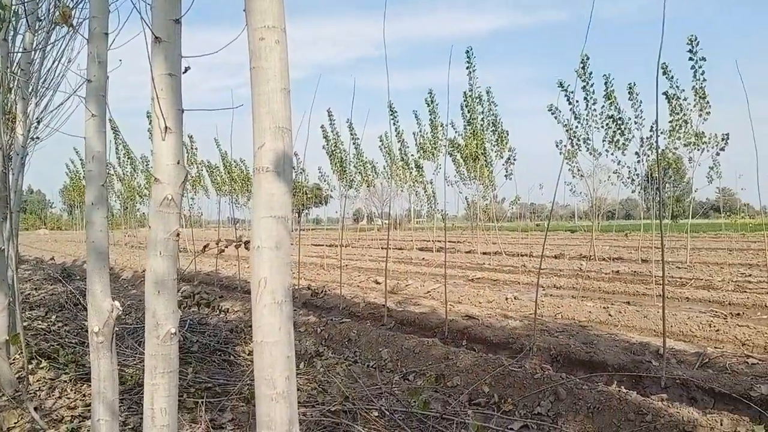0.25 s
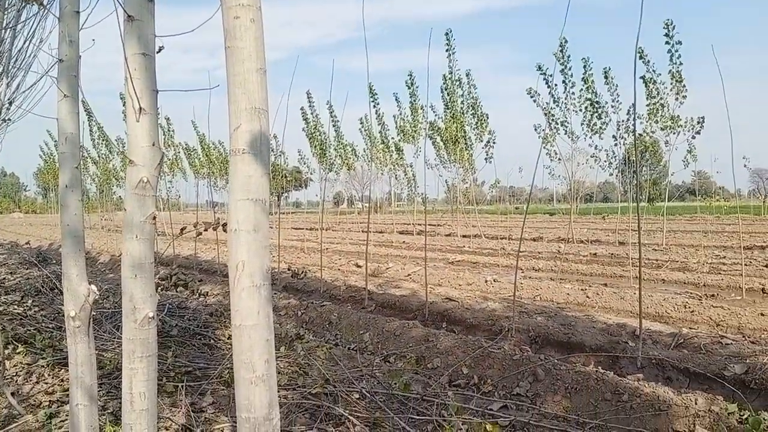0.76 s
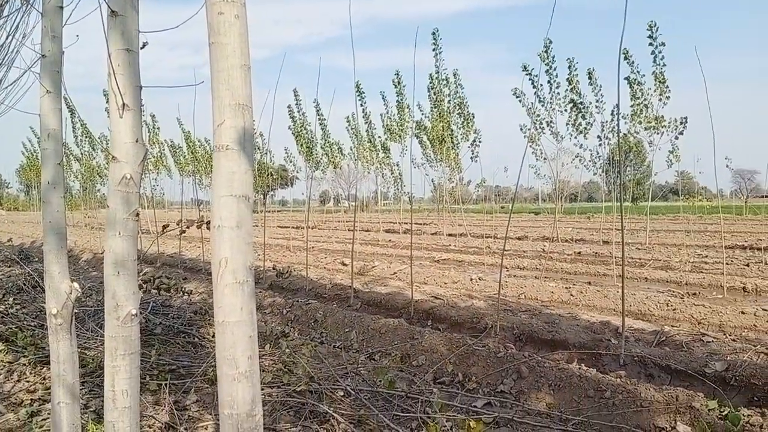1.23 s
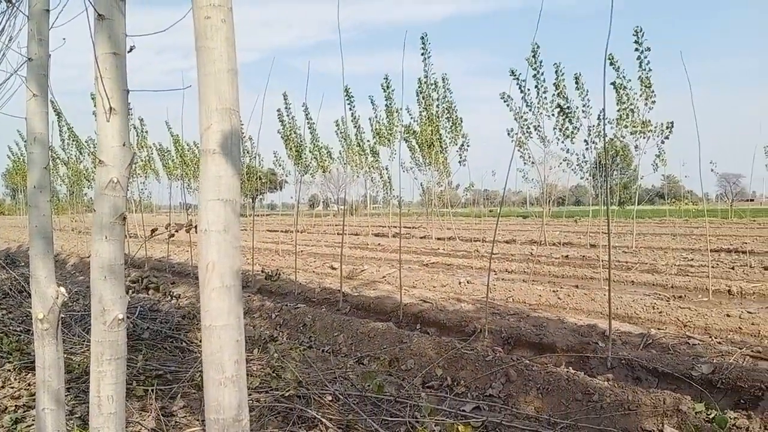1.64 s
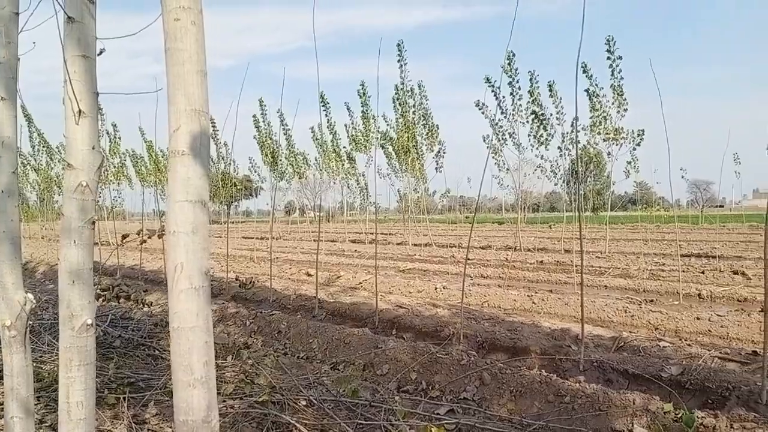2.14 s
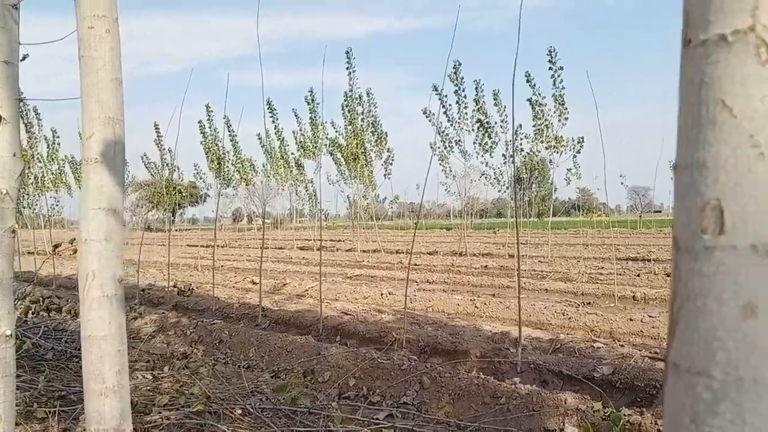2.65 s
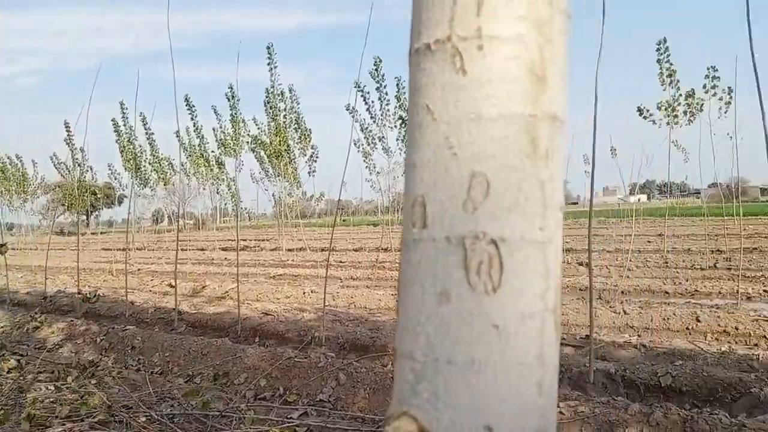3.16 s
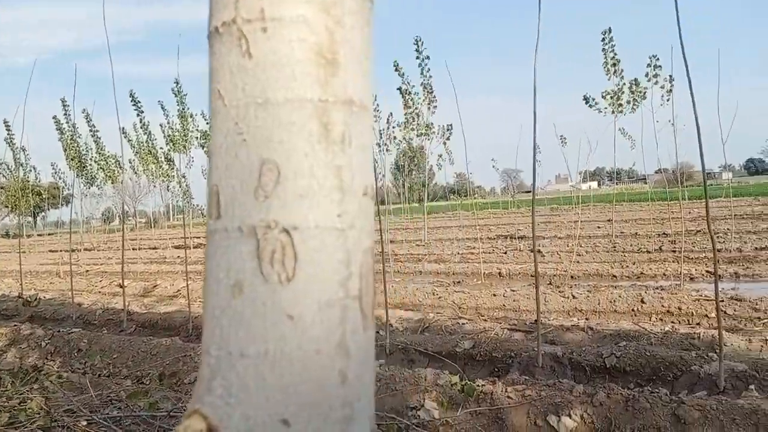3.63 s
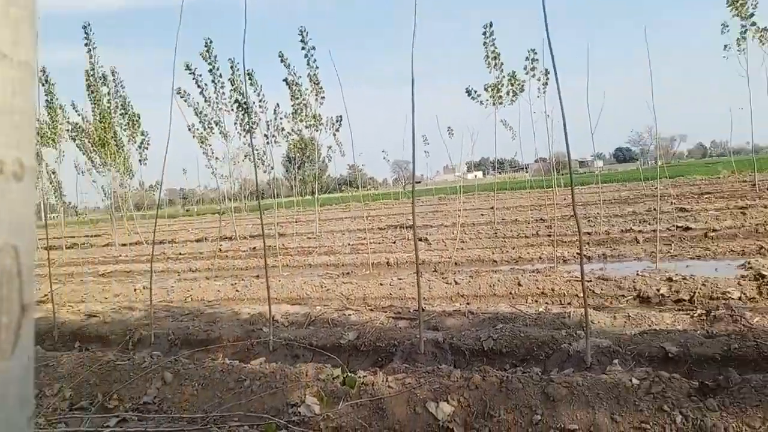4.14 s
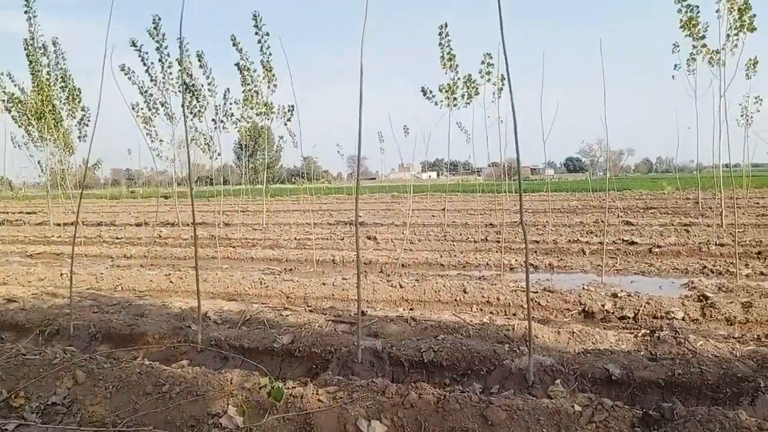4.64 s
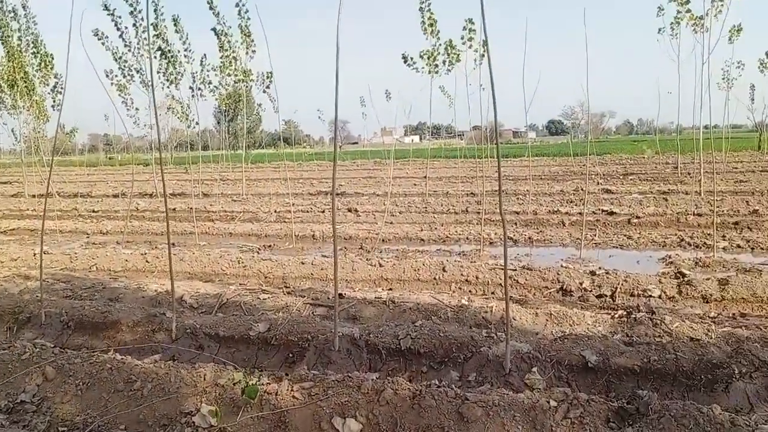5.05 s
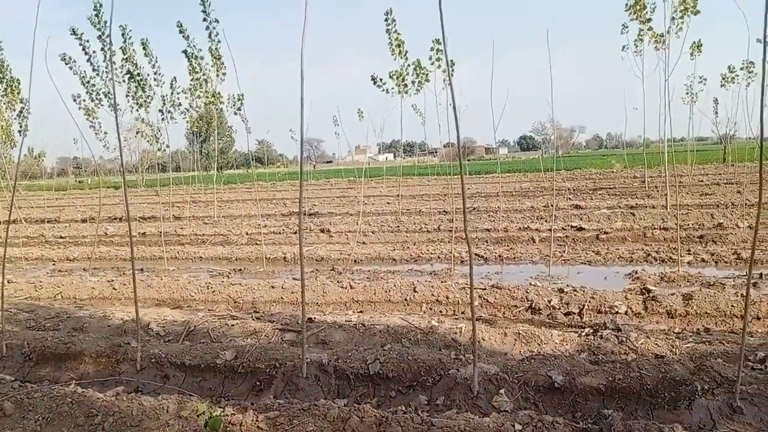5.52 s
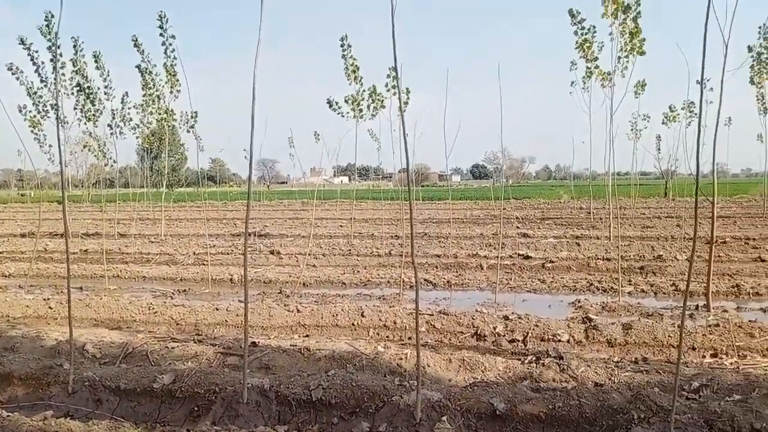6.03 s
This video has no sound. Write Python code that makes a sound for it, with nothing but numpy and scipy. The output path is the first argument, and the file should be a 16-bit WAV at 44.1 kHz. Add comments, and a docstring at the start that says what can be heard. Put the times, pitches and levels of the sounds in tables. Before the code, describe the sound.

At the edge of a field, wind rumbles and thumps against a phone microphone for about a second. After a quiet moment, feet shift close by in dry leaves and soil, crunching and cracking twigs. Weaker gusts return, and the sharpest snaps and crunches follow in clusters, with a few faint squeaks of rubbing stems. Distant treetops hiss very faintly throughout.

```python
"""Someone with a phone shifts their feet in dry leaves and clods at a field's edge; far treetops hiss.
In the first second, gusts rumble past the microphone port and their eddies bump the diaphragm.
From about 2 s, leaves crunch underfoot in many small fractures, twigs snap and rubbing stems squeak.
Near 4 s, weaker gusts return; the loudest snaps follow in clusters until just after 6 s."""
import sys
import numpy as np
from scipy import signal
from scipy.fft import rfft, irfft
from scipy.io import wavfile
from scipy.ndimage import uniform_filter1d

SR = 44100
rng = np.random.default_rng(int(sys.argv[2]) if len(sys.argv) > 2 else 0)


def unload_wav(signal):
    """Save mono or channel-first audio to the path in sys.argv[1] as 16-bit WAV at rate SR, clipped to [-1, 1]."""
    wavfile.write(
        sys.argv[1],
        SR,
        np.round(np.clip(np.atleast_2d(signal).T, -1, 1) * 32767).astype(np.int16),
    )


N = 276948
BODY_TOP_HZ, GRIT_FOOT_HZ = 2800, 10000


def gain_of(db):
    return 10 ** (np.asarray(db) / 20)


def unit_rms(x):
    return x / np.sqrt(np.mean(x ** 2) + 1e-20)


def spectrum_db(points, hz):
    """Spectrum points joined on a log-frequency axis."""
    point_hz, db = np.transpose(points)
    return np.interp(np.log(hz + 1), np.log(point_hz + 1), db)


def gain_curve(points):
    """Per-sample gain from (time [s], level [dB]) points."""
    return gain_of(np.interp(np.arange(N) / SR, *np.transpose(points)))


def drift(samples):
    """Slow random drift, RMS 1, in lumps about `samples` long."""
    return unit_rms(uniform_filter1d(uniform_filter1d(rng.standard_normal(N), samples), samples))


def patches(frames, bins, patch_bins, patch_frames):
    """Patchy random field over frequency and time, RMS 1."""
    field = rng.standard_normal((frames, bins)).T
    return unit_rms(uniform_filter1d(uniform_filter1d(field, patch_bins, 0), patch_frames, 1))


def band_noise(hz, half_width_hz, size=N):
    """Narrow noise band, RMS 1."""
    offset = (np.fft.rfftfreq(size, 1 / SR) - hz) / half_width_hz
    return unit_rms(irfft(rfft(rng.standard_normal(size)) / (1 + offset ** 4), size))


def swells(full_s, hold_s, rise_s, fall_s):
    """Power envelopes, one row each, every 16th sample; rise and fall span 30 dB."""
    t = np.arange(0, N, 16) / SR - np.reshape(full_s, (-1, 1))
    hold, rise, fall = (np.reshape(v, (-1, 1)) + 1e-3 for v in (hold_s, rise_s, fall_s))
    return gain_of(60 * np.minimum(np.minimum(t / rise, (hold - t) / fall), 0))


def summed_gain(db, power):
    """Per-sample gain of swells added in power."""
    return np.interp(np.arange(N), np.arange(0, N, 16), np.sqrt(gain_of(2 * db) @ power))


# far foliage spectrum: (frequency [Hz], relative density [dB])
TREETOP_SPECTRUM = [(88, -58), (150, -3.5), (622, -9), (919, -7.5), (1160, -1), (1550, -2.5), (1930, 0.5),
                    (3140, -11), (6700, -15.5), (7830, -21.5), (9340, -42.5), (14900, -25.5),
                    (15800, -31.5)]
# breeze in the trees: (time [s], level [dB])
BREEZE = [(0, -69), (.6, -72.5), (1.3, -71.5), (2.0, -73), (2.85, -75), (3.4, -74.5), (4.15, -72),
          (5.3, -77), (6.28, -74)]


def treetops():
    """Far leaves hiss steadily; faint, narrow, shifting streaks colour the background; treble flickers."""
    frames, hz = N // 256 + 5, np.fft.rfftfreq(1024, 1 / SR)
    real, imag = rng.standard_normal((frames, 513, 2)).T
    top = 1 / (1 + (GRIT_FOOT_HZ / (hz[:, None] + 1)) ** 8)
    flicker_db = 3.5 * top * np.resize(drift(400)[::256], frames)
    streak_db = 3.8 * (1 - top) * patches(frames, 513, 3, 14)
    stft = (real + 1j * imag) * gain_of(spectrum_db(TREETOP_SPECTRUM, hz)[:, None] + streak_db + flicker_db)
    hiss = signal.istft(stft, nperseg=1024, noverlap=768)[1][:N]
    return unit_rms(hiss) * gain_curve(BREEZE)


def thin_hiss(level_db=-92.5, waver_db=4.0):
    """Faint, narrow, high hiss."""
    return band_noise(hz=7800, half_width_hz=60) * gain_of(level_db + waver_db * drift(3000))


# swells of the rush: (time at full level [s], hold [s], level [dB])
RUSHES = [(0.0, 0.26, -59.5), (0.285, 0.045, -63.5), (1.259, 0.051, -72.5), (1.888, 0.15, -73),
          (2.306, 0.062, -72.5), (3.1, 0.035, -71.5), (3.644, 0.34, -66), (4.29, .01, -70.5),
          (4.76, 0.058, -64.5), (5.154, 0.15, -67.5), (5.409, 0.0087, -59), (5.508, 0.076, -74.5)]


def hollow_rush(floor_db=-96, waver_db=2.0):
    """Low, hollow band of air noise that comes and goes."""
    full_s, hold_s, db = np.transpose(RUSHES)
    power = swells(full_s, hold_s, rise_s=0.092, fall_s=0.13)
    flow = np.hypot(summed_gain(db, power), gain_of(floor_db))
    return band_noise(hz=344.3, half_width_hz=79) * flow * gain_of(waver_db * drift(900))


# wind spectrum at the port: (frequency [Hz], relative density [dB])
RUMBLE_SPECTRUM = [(12, -32), (20, -19), (54, -6), (75, 7.5), (100, -5.5), (141, -14), (199, -29),
                   (260, -40.5), (340, -57), (570, -120)]
# gusts: (time at full level [s], hold [s], 30 dB fall [s], level [dB])
GUSTS = [(0.0, 0.19, 0.13, -44.5), (0.194, 0.047, 0.1, -37), (0.411, 0.13, 0.14, -43.5),
         (0.61, 0.027, .1, -52), (0.843, 0.087, .2, -48.5), (0.972, 0.031, 0.13, -43.5),
         (1.272, .015, 0.35, -56), (1.635, 0.031, 0.2, -62), (3.144, .015, 0.2, -56.5),
         (3.967, 0.032, 0.23, -45.5), (4.21, 0.013, .15, -60), (4.35, 0.15, 0.45, -55),
         (4.735, 0.036, 0, -51), (4.902, .015, 0.16, -52.5), (5.028, .05, 0.3, -58)]
# rumble between gusts: (time [s], level [dB])
RUMBLE_FLOOR = [(0, -76.5), (2.0, -73), (3.05, -66.5), (3.3, -77.5), (3.9, -66.5), (5.2, -72.5),
                (6.28, -74.5)]


def wind_rumble(rise_s=0.073, waver_db=2.5):
    """Gusts rumble unevenly past the microphone port."""
    colour = gain_of(spectrum_db(RUMBLE_SPECTRUM, np.fft.rfftfreq(N, 1 / SR)))
    rumble = unit_rms(irfft(rfft(rng.standard_normal(N)) * colour, N))
    full_s, hold_s, fall_s, db = np.transpose(GUSTS)
    gusts = summed_gain(db, swells(full_s, hold_s, rise_s, fall_s))
    return rumble * np.hypot(gusts, gain_curve(RUMBLE_FLOOR)) * gain_of(waver_db * drift(900))


# pressure bumps at the port: (time [s], envelope peak [dB], pitch [Hz])
EDDIES = [(0.014, -29, 107), (0.047, -22, 150), (0.115, -19, 158), (0.141, -33, 122), (0.198, -19, 144),
          (0.228, -29.5, 123), (0.246, -23, 106), (0.275, -35.5, 134), (0.403, -25.5, 130),
          (0.438, -31.5, 135), (0.463, -28.5, 110), (0.495, -37, 87.5), (0.535, -23, 122),
          (0.607, -24.5, 102), (0.822, -22.5, 127), (0.86, -37, 99), (0.913, -35.5, 74), (0.932, -33, 111),
          (0.955, -38, 122), (0.986, -23, 133), (1.013, -34.5, 88), (1.306, -42.5, 67),
          (1.376, -48.5, 88.5), (1.424, -49.5, 96.5), (1.664, -40.5, 73.5), (3.173, -39, 69),
          (3.971, -30, 117), (4.006, -35, 100), (4.366, -40.5, 102), (4.437, -39, 97), (4.459, -34.5, 108),
          (4.499, -40, 91), (4.535, -40.5, 109), (4.721, -42, 83), (4.764, -40, 73)]


def eddy_bumps(width_cycles=0.23, glide=0.2):
    """Each eddy pushes and pulls the diaphragm for about one cycle, quick at first, then slower."""
    out, t = np.zeros(N + 4000), np.arange(-2000, 2000) / SR
    for (s, db, hz), phase in zip(EDDIES, rng.random(len(EDDIES))):
        envelope = 1 / np.cosh(t * hz / width_cycles)
        cycles = hz * t - glide * np.log(np.cosh(hz * t)) + phase
        out[round(s * SR):][:4000] += gain_of(db) * envelope * np.cos(2 * np.pi * cycles)
    return out[2000:N + 2000]


# whistles and squeaks: (start [s], length [s], pitch [Hz], level [dB])
SQUEAKS = [(0.16, .13, 1280, -68), (0.291, 0.18, 2586, -73), (0.372, 0.15, 1898, -68),
           (1.041, 0.063, 5280, -72), (1.13, 0.12, 2700, -75), (1.885, 0.059, 1710, -66),
           (2.464, 0.049, 1550, -57), (3.114, 0.36, 1910, -75.5), (3.302, 0.038, 4340, -67.5),
           (3.127, 0.13, 4600, -76.5), (3.644, 0.12, 5450, -69.5), (3.779, 0.076, 738, -58.5),
           (3.753, 0.23, 5310, -66.5), (3.881, 0.074, 1555, -58.5), (4.378, 0.17, 1426, -51.5),
           (4.667, 0.097, 1216, -55), (4.783, 0.065, 1300, -56), (4.999, 0.19, 987, -71.5),
           (5.132, 0.049, 4360, -68.5), (5.788, 0.18, 3770, -58.5), (5.797, 0.14, 5500, -59.5),
           (5.881, 0.15, 1636, -59.5)]


def squeaks(half_width_ratio=0.031):
    """Brief fuzzy whistles; the louder ones are stems rubbing underfoot."""
    out = np.zeros(N)
    for s, length_s, hz, db in SQUEAKS:
        size = round(length_s * SR)
        whistle = band_noise(hz, half_width_ratio * hz, size=16384)[:size]
        out[round(s * SR):][:size] += gain_of(db) * signal.windows.tukey(size, .6) * whistle
    return out


def minimum_phase(db):
    """Unit-energy impulse response for levels on 2049 bins."""
    log_gain = np.log(gain_of(np.maximum(db, db.max() - 100)))
    mirrored = np.concatenate([log_gain, log_gain[-2:0:-1]])
    taps = np.fft.ifft(np.exp(np.conj(signal.hilbert(mirrored)))).real[:2048]
    return taps / np.linalg.norm(taps)


# dry leaves under a sole: (frequency [Hz], relative density [dB])
LITTER_SPECTRUM = [(180, -51), (300, -32.5), (343, -31), (573, -12), (853, -7), (1170, -6), (1250, 0.5),
                   (2050, -5), (2820, -8), (3670, 4), (5030, 0), (6780, 9), (10300, -16), (12900, -3),
                   (15800, 7)]


def litter_filters():
    """Leaf spectrum split into crackle (mid), soil body (low) and fine grit (high)."""
    hz = np.fft.rfftfreq(4096, 1 / SR)
    body = 1 / (1 + (hz / BODY_TOP_HZ) ** 16)
    grit = 1 - 1 / (1 + (hz / GRIT_FOOT_HZ) ** 24)
    return [minimum_phase(spectrum_db(LITTER_SPECTRUM, hz) + 10 * np.log10(abs(share) + 1e-9))
            for share in (1 - body - grit, body, grit)]


def leaf_resonances(x, spread_db=4.5):
    """Every leaf and clod rings differently: the colour shifts in patches."""
    stft = signal.stft(x, nperseg=256, noverlap=192)[2]
    stft *= gain_of(spread_db * patches(stft.shape[1], len(stft), 2, 44))
    return signal.istft(stft, nperseg=256, noverlap=192)[1][:N]


# foot movements: (time at full level [s], hold [s], 30 dB rise [s], 30 dB fall [s],
# crackle [dB], soil body [dB re crackle], grit [dB re crackle])
TREADS = [(0.585, 0.015, 0.043, 0.085, -63, -4.5, -13), (0.81, 0.027, 0.033, 0.03, -75.5, 3.5, -10),
          (1.064, .005, 0.16, 0.039, -74, -9, -10), (1.748, .005, 0.15, 0.11, -79.5, -17, -17),
          (1.926, .005, .07, 0.086, -70, -10, -17), (2.018, 0.0059, 0.01, 0.087, -63.5, -7, 6),
          (2.286, 0.089, 0.088, 0.18, -50.5, -3.5, 3), (2.439, 0.047, 0.25, 0.14, -53, -1.5, 0),
          (2.569, .005, 0.13, 0.16, -52.5, -6, -4), (3.017, .005, 0.29, .12, -75.5, -10, -9),
          (3.111, .005, 0.12, 0.27, -69, -1.5, -10), (3.315, .005, 0.18, 0.35, -72, -1.5, -3),
          (3.689, 0.0042, 0.23, .1, -69, 1, 3.5), (3.814, 0.0022, 0.076, 0.042, -49.5, 0, 1),
          (3.851, 0.07, 0.15, 0.14, -68, 2.5, -5), (4.296, 0.015, 0.027, 0.068, -43.5, 2, -2.5),
          (4.428, 0.022, 0.018, 0.084, -52.5, -3, 10), (4.473, 0.012, .12, 0.065, -43.5, -4.5, 6.5),
          (4.609, 0.0026, 0.15, 0.089, -48, -3, 1.5), (4.771, .005, 0.24, 0.33, -58, -5, -4),
          (4.836, 0.027, 0.031, .12, -49, -1.5, 0), (5.143, 0.0061, .11, 0.22, -65.5, -10, 1),
          (5.397, 0.02, .013, 0.054, -43, -0.5, -4), (5.614, 0.0043, 0.067, 0.081, -75, -7, -4),
          (5.699, .005, 0.066, .2, -64.5, -4, 2), (5.743, 0.23, 0.027, .1, -56.5, -10.5, -2.5),
          (6.008, .048, 0.052, 0.048, -40.5, -3, 1.5), (6.22, .005, 0.07, 0.18, -76.5, -25, -4)]


def leaf_crunch(fractures_per_s=500, spread_db=3.0, grain_s=0.0011, settle_db=-18.5, settle_fall_s=0.21):
    """Many small fractures, a few large, over the hiss of sliding leaves, which then settle softly."""
    sizes = gain_of(spread_db * np.minimum(rng.exponential(1, N), 4))
    fractures = sizes * (rng.random(N) < fractures_per_s / SR)
    grain = np.exp(-np.arange(600) / SR / grain_s)
    bursts = np.sqrt(abs(signal.oaconvolve(fractures ** 2, grain)[:N]))
    sliding = gain_of(2.0 * drift(200))
    drive = unit_rms((unit_rms(bursts) + sliding) * rng.standard_normal(N))
    full_s, hold_s, rise_s, fall_s, crackle_db, body_db, grit_db = np.transpose(TREADS)
    settling = gain_of(2 * settle_db) * swells(full_s, hold_s, rise_s, settle_fall_s)
    power = swells(full_s, hold_s, rise_s, fall_s) + settling
    bands = [signal.oaconvolve(drive * summed_gain(crackle_db + db, power), taps)[:N]
             for db, taps in zip((0, body_db, grit_db), litter_filters())]
    return leaf_resonances(sum(bands))


# twigs and stems breaking: (time [s], crack level [dB], ring pitch [Hz], grit [dB re crack])
TWIG_BREAKS = [(1.9038, -65, 1770, -21), (2.0176, -68, 3500, 23), (2.2405, -53, 7540, 7),
               (2.2936, -44.5, 1720, 6), (2.439, -38.5, 3960, -14), (2.4534, -42, 2700, -9),
               (2.472, -46, 1660, -13), (2.495, -45.5, 1670, 5), (2.5673, -45, 6440, 2),
               (2.5781, -44, 1607, 2), (2.5956, -50.5, 1550, -14), (2.7736, -51.5, 7000, 0),
               (3.1112, -58, 1790, 16.5), (3.3082, -59, 4220, 4), (3.7708, -59, 1460, 13),
               (3.8152, -43, 6140, -15), (3.906, -68, 1440, -27), (4.2953, -37, 6460, 4.5),
               (4.302, -34.5, 1536, -9), (4.3083, -34.5, 1320, -3), (4.3119, -31.5, 3460, -17),
               (4.3266, -34.5, 7000, 3.5), (4.3943, -53, 5900, .4), (4.4029, -43.5, 1490, 9),
               (4.4025, -36.5, 6900, -2), (4.416, -48, 6950, 7), (4.4256, -39.5, 7160, 7),
               (4.442, -40, 1500, -4), (4.448, -31.5, 6930, 3), (4.457, -37, 5700, 2),
               (4.483, -34, 1270, 8.5), (4.489, -29.5, 5520, -13), (4.5, -41, 6100, 0),
               (4.5067, -40.5, 1220, 7), (4.5694, -33, 5320, 2), (4.5929, -34, 4040, 4),
               (4.6032, -35, 6960, -5), (4.609, -30.5, 7600, -1), (4.624, -41.5, 4130, 6),
               (4.632, -33.5, 6800, -5), (4.6428, -40, 1765, 1), (4.7667, -59, 5270, 19.5),
               (4.832, -41, 6900, -7), (4.839, -41, 2600, 7), (4.8582, -48, 1430, -10.5),
               (4.867, -47, 4400, 14.5), (4.9015, -40, 4230, 4), (4.9186, -48.5, 6800, 8),
               (4.9639, -46.5, 7400, 5), (5.135, -57.5, 6950, 4), (5.3945, -38, 4200, 3),
               (5.4102, -34.5, 4690, 12), (5.4174, -41, 4370, -2), (5.4474, -46.5, 8400, 3),
               (5.7094, -48, 6900, 1), (5.746, -35, 7350, -1), (5.756, -38.5, 5330, -1.5),
               (5.77, -40.5, 3980, 1), (5.7875, -44.5, 5800, 3.5), (5.9823, -44.5, 3500, -12),
               (5.995, -36, 3980, -10.5), (6.013, -34.5, 6640, -4), (6.027, -36.5, 2130, 1),
               (6.0526, -31, 2020, 3), (6.061, -43.5, 1166, -5), (6.2213, -58.5, 8500, 2)]


def twig_snaps(ring_db=-7.5, decay_cycles=25.0, log_width=0.32,
               thick_body_db=-2, thin_body_db=-6.5, thin_db_per_octave=-5):
    """A sharp crack, a weaker shiver of nearby leaves and the short ring of the stem."""
    t, out = np.arange(1300) / SR, np.zeros(N + 1300)
    shiver = gain_of(-11) * np.exp(-t / .004)
    envelope = (np.exp(-t / .0007) + shiver) * np.minimum(t / .0002, 1)
    envelopes = envelope, envelope, envelope ** .7  # grit scatters longer
    noise = rng.standard_normal((len(TWIG_BREAKS), len(t)))
    bands = np.array([signal.fftconvolve(noise * shape, taps[None], axes=1)[:, :len(t)]
                      for shape, taps in zip(envelopes, litter_filters())])
    ring_hz = np.transpose(TWIG_BREAKS)[2][:, None]
    log_offset = np.log((np.fft.rfftfreq(len(t), 1 / SR) + 1) / ring_hz)
    stem_peak = 1 / (1 + (log_offset / log_width) ** 2)
    bands[:2] = irfft(rfft(bands[:2]) * stem_peak, len(t))
    bands /= np.sqrt(np.mean(bands[..., :70] ** 2, axis=2, keepdims=True))  # RMS 1 over the first 1.6 ms
    for (s, db, hz, grit_db), crack in zip(TWIG_BREAKS, bands.transpose(1, 0, 2)):
        thick = hz < BODY_TOP_HZ
        body_db = thick_body_db if thick else thin_body_db + thin_db_per_octave * np.log2(hz / BODY_TOP_HZ)
        ring_gain = gain_of(db + ring_db + (body_db if thick else 0))
        ring = ring_gain * np.exp(-t * hz / decay_cycles) * np.sin(2 * np.pi * hz * t)
        out[round(s * SR):][:len(t)] += gain_of([db, db + body_db, db + grit_db]) @ crack + ring
    return out[:N]


def scene():
    """Far trees, wind and feet at one microphone."""
    background = treetops() + thin_hiss()
    wind = hollow_rush() + wind_rumble() + eddy_bumps()
    feet = squeaks() + leaf_crunch() + twig_snaps()
    return (background + wind + feet)[None]


def record(dry):
    """The phone drops the bass below 50 Hz and the treble above 15.8 kHz."""
    highpass = signal.butter(3, 50, "high", fs=SR, output="sos")
    lowpass = signal.firwin(801, 15800, window=("kaiser", 9), fs=SR)
    return signal.oaconvolve(signal.sosfilt(highpass, dry), lowpass[None], "same")


dry = scene()
out = record(dry)
unload_wav(out)
```